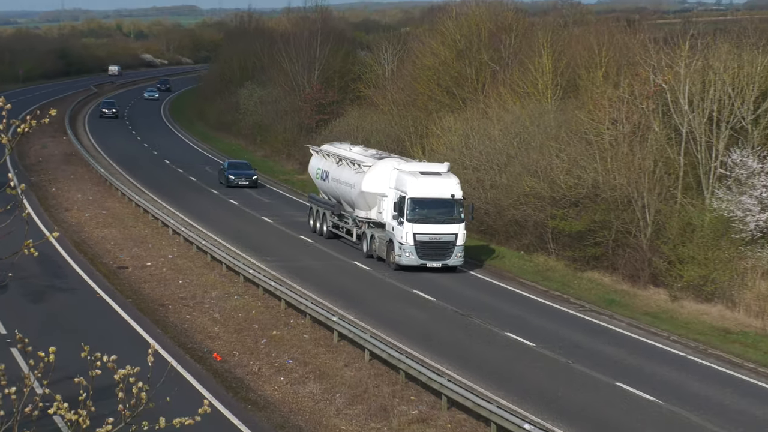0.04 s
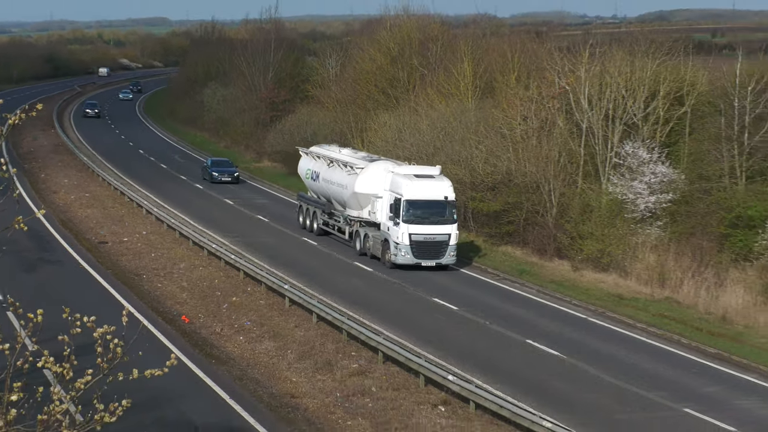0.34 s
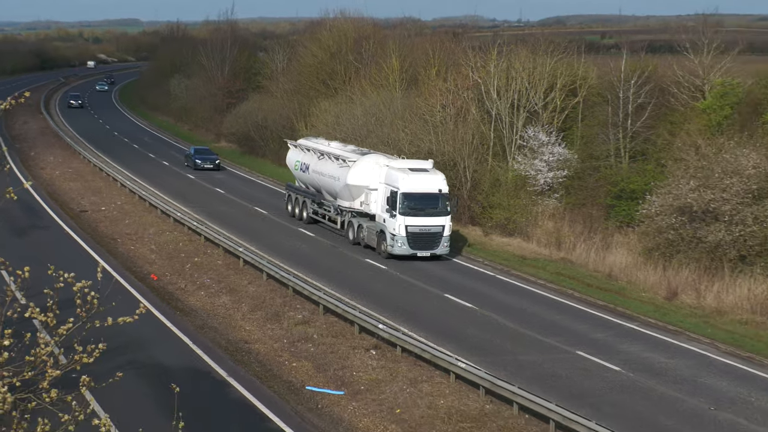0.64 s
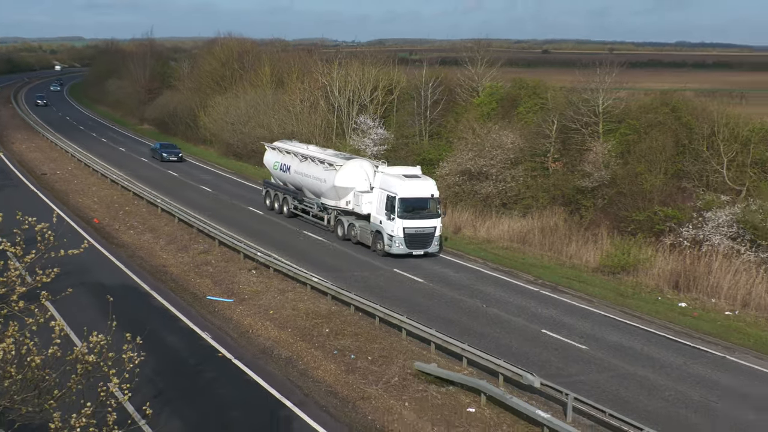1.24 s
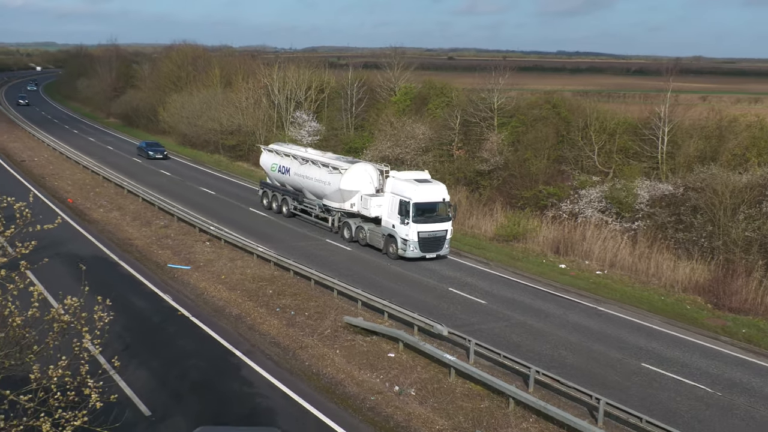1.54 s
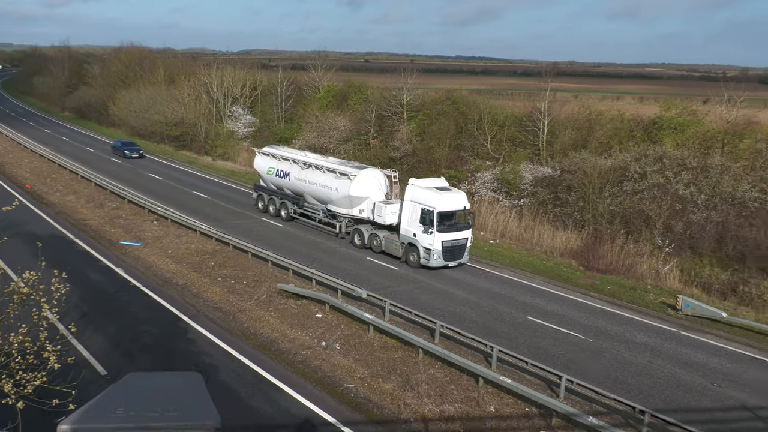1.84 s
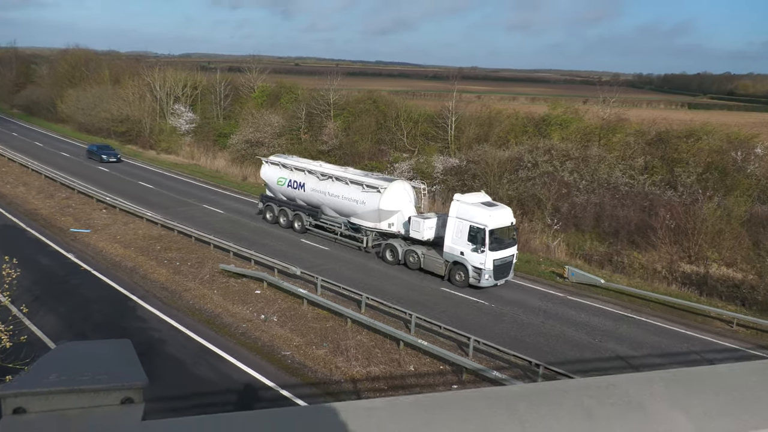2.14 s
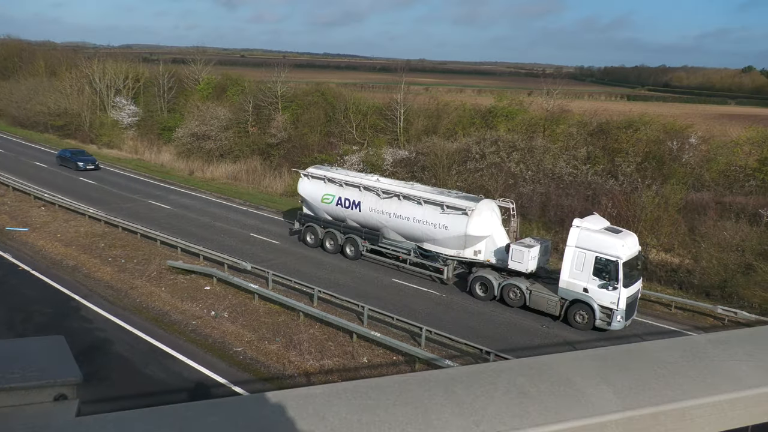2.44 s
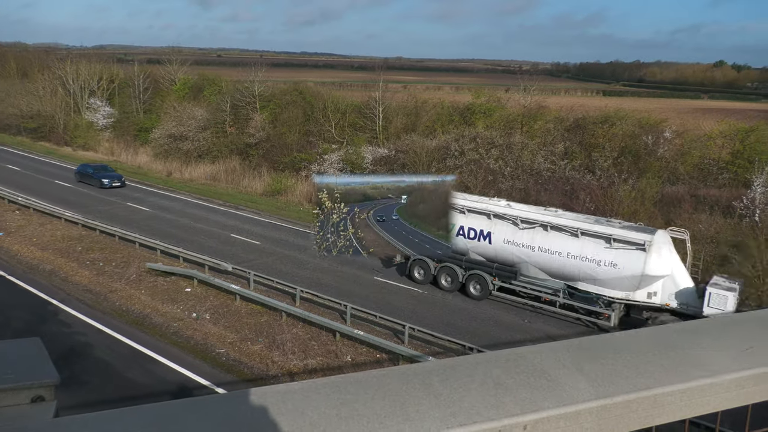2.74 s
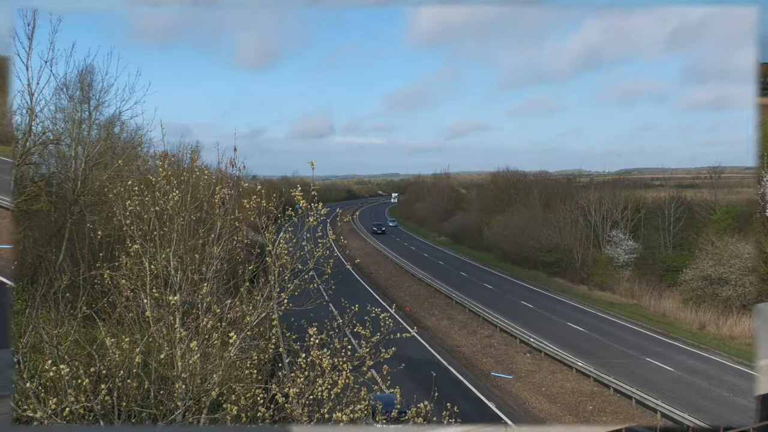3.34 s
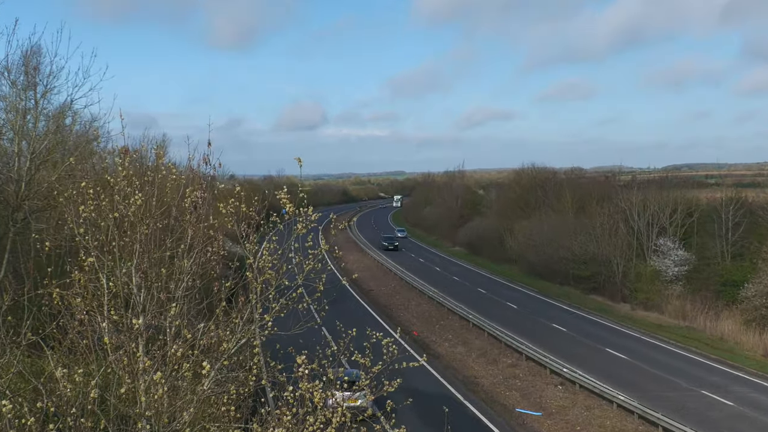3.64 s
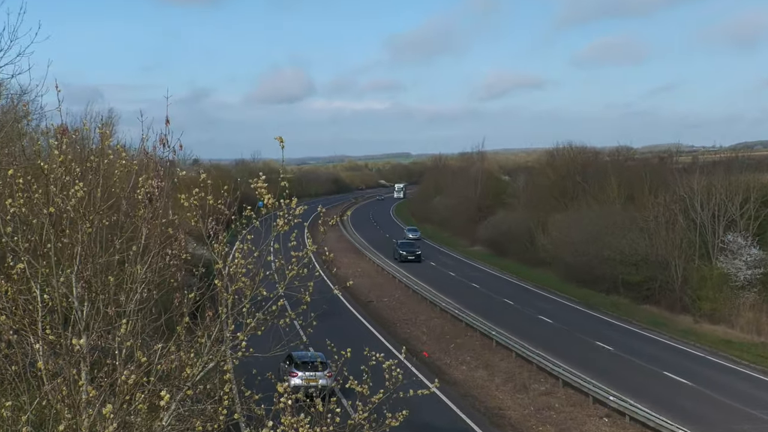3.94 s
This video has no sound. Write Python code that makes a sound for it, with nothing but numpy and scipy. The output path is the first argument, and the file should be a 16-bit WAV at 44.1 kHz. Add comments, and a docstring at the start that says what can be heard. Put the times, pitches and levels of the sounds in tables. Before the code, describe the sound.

A heavy lorry passes under a road bridge, heard from above against steady distant traffic and gusts on the microphone. From about 1 second its tyre roar, rumble and low exhaust drone build. Loose metal fittings faintly rattle and clink between 1.5 and 2.5 seconds. The drone drops in pitch and fades by 3 seconds, when the tyre noise of following cars swells and continues until 4 seconds.

```python
"""A tanker lorry passes under a road bridge, heard from the parapet.
From the start, far traffic and nearer cars sound as broadband noise while gusts buffet the microphone.
The lorry approaches: its tyres roar, its body rumbles and its exhaust drones at multiples of the
firing rate. As it goes by, small parts chatter and loose fittings clink, ringing at their metal modes.
The drone sinks in pitch and fades beneath the bridge, and the tyres of following cars swell."""
import sys
import numpy as np
from scipy import signal
from scipy.fft import rfft, irfft
from scipy.io import wavfile
from scipy.ndimage import uniform_filter1d

SR = 44100
rng = np.random.default_rng(int(sys.argv[2]) if len(sys.argv) > 2 else 0)


def store_wav(level_fs):
    """Save 16-bit WAV to argv[1]."""
    pcm = np.round(np.clip(np.atleast_2d(level_fs), -1, 1) * 32767)
    wavfile.write(sys.argv[1], SR, pcm.T.astype(np.int16))


N = 176400

# noise spectra of the sources (f/Hz, relative density/dB)
TRAFFIC_SPECTRUM = [(20, -20), (60, -7.5), (110, -6), (210, -1), (400, -5), (660, -0.5), (1000, -5),
                    (1400, -8), (2000, -18.5), (2600, -25.5), (3500, -30), (5000, -39), (6800, -47),
                    (8200, -50.5), (10000, -56.5), (12500, -78.5)]
LORRY_ROAR_SPECTRUM = [(250, -19), (450, -6), (600, -1.5), (730, 1.5), (830, -0.5), (920, 2), (1100, -3.5),
                       (1350, -20.5), (1700, -13.5), (2300, -29), (4000, -59)]
LORRY_RUMBLE_SPECTRUM = [(20, -26), (55, -10), (90, -1), (160, -0.5), (190, 3), (240, 1.5), (320, -0.5),
                         (420, -10.5), (800, -27), (2000, -68)]
LORRY_HISS_SPECTRUM = [(800, -4.5), (1750, -5), (2400, -0.5), (3400, -2.5), (4400, -8.5), (5800, -14),
                       (7000, -18.5), (8100, -19), (10000, -28), (12500, -47)]
CAR_ROAR_SPECTRUM = [(100, -28), (250, -3), (450, -9), (720, 4.5), (930, 1.5), (1150, 1.5), (1500, -13),
                     (2200, -26), (4000, -55)]
CAR_HISS_SPECTRUM = [(500, -5), (1300, -3), (1900, 0), (2600, -19), (3600, -17.5), (5500, -27),
                     (8200, -36.5), (10000, -40), (12500, -61.5)]
WIND_SPECTRUM = [(10, -18.5), (22, -5.5), (45, -4), (70, 1.5), (150, -3.5), (250, -11.5), (450, -21.5),
                 (800, -37), (2000, -76.5)]
CHATTER_SPECTRUM = [(1500, -10.5), (3200, 6), (4600, 0.5), (6200, -6), (8100, -10.5), (10200, -16.5),
                    (12000, -38.5)]
# likeness of the two channels (f/Hz, correlation)
ROAD_CORRELATION = [(450, 1), (900, 0.97), (1900, 0.85), (2800, 0.54), (5000, 0.24), (8200, .05),
                    (10500, -.8)]
LORRY_CORRELATION = [(100, 1), (3500, 1), (6000, 0.39), (8500, -0.12), (10500, -.4)]
# stereo balance of the lorry's hiss and chatter, and of the cars (f/Hz, left minus right/dB)
LORRY_BALANCE = [(1000, -5), (1650, 7), (2150, 6), (2800, 5.5), (4300, 2), (5500, 3.5), (6500, 4.5),
                 (7800, -7), (9300, 6)]
CAR_BALANCE = [(300, 0), (750, -3.5), (1700, 0), (3000, -3.5), (6000, 1)]
# the lorry's pass (t/s, tyre roar/dB, body rumble/dB, tyre hiss/dB)
LORRY_LEVELS = [(0, -31.5, -25.5, -54.5), (.85, -33.5, -39, -58), (1.1, -24, -28.5, -45.5),
                (1.4, -21, -27.5, -47), (1.7, -20.5, -27.5, -41), (1.82, -23.5, -28.5, -41),
                (2.05, -20, -24.5, -38.5), (2.32, -22, -26, -42), (2.5, -21.5, -27, -41),
                (2.73, -21, -22.5, -44), (2.92, -30.5, -36, -49.5), (3.3, -39, -50, -52),
                (4, -47.5, -40, -74.5)]
# note of the tyre treads (t/s, f/Hz, level relative to the roar/dB)
TREAD_NOTE = [(0, 645, -15), (1.0, 660, -13), (1.4, 680, -7.5), (1.7, 700, -4.5), (2.1, 748.4, -5),
              (2.35, 713, -5), (2.8, 640, -9), (4, 595, -11.5)]
# cars on the near lanes (t/s, tyre roar/dB, tyre hiss/dB)
CAR_LEVELS = [(0, -34, -61), (.7, -37.5, -40.5), (1.25, -36, -35.5), (2.0, -51, -56), (2.9, -26, -46),
              (3.1, -25, -33), (3.35, -25, -33.5), (3.65, -26.5, -37.5), (3.9, -21, -41), (4, -22, -52)]
# wind on the microphone (t/s, level/dB)
GUST_LEVELS = [(0, -39.5), (.15, -27), (.55, -26.5), (.95, -31), (1.15, -26.5), (1.3, -36), (1.7, -29),
               (1.85, -45), (2.13, -29), (2.47, -53.5), (3.2, -48), (3.5, -36.5), (3.75, -38), (4, -52)]
# exhaust drone (t/s, firing rate/Hz, level/dB)
EXHAUST_DRONE = [(0, 69, -48), (.7, 68.5, -39), (1.1, 67.8, -31), (1.7, 67.5, -30), (2.4, 66.1, -29.5),
                 (2.6, 62, -33), (2.8, 58, -47), (3.1, 56, -70)]
# engine orders (multiple of the firing rate, relative level/dB)
ENGINE_ORDERS = [(1, -0.5), (2, -13.5), (2.5, -17), (3, -20), (3.5, -15)]
# small loose parts along the chassis (t/s, level/dB)
CHATTER_LEVELS = [(0, -75), (1.4, -63), (1.65, -52), (1.85, -52), (2.15, -46.5), (2.3, -53), (2.7, -48.5),
                  (2.9, -58), (4, -83)]
# impacts of loose fittings (t/s, level/dB, band centre/Hz, left minus right/dB, crash T60/s)
FITTING_IMPACTS = [(1.576, -34, 4400, 3, .02), (1.620, -35.5, 3900, 3, .025), (1.657, -32.5, 3500, 3, .035),
                   (1.717, -36, 4600, 4, .035), (2.024, -34, 4500, 2, .065), (2.081, -37, 4500, 2, .03),
                   (2.126, -39, 5200, 2, .03), (2.156, -33, 5200, 2, .04), (2.242, -31, 5800, 0, .04),
                   (2.369, -39.5, 6900, -3, .06), (2.396, -37, 3200, 0, .02), (2.437, -38.5, 8700, -2, .02),
                   (2.453, -31.5, 7100, -7, .04)]
# natural modes of the fittings (f/Hz, relative level/dB, T60/s)
METAL_MODES = [(3400, 2, .08), (4300, -2, .06), (6020, -4, .05), (7320, -3, .06), (7980, -2, .09),
               (8230, -3, .09), (8800, -5, .08), (9650, -2, .05)]


def amp(db):
    """Amplitude ratio of a level in decibels."""
    return 10 ** (np.asarray(db) / 20)


def unit(x):
    """Normalisation to rms 1."""
    return x / np.sqrt(np.mean(x ** 2) + 1e-20)


def curve(rows, column=1):
    """Linear interpolation of a time table at every sample."""
    rows = np.array(rows)
    return np.interp(np.arange(N) / SR, rows[:, 0], rows[:, column])


def at_frequencies(points, hz):
    """Interpolation of a table on a log-frequency axis."""
    f, value = np.transpose(points)
    return np.interp(np.log(hz + 1), np.log(f + 1), value)


def band(hz, centre, octaves):
    """A Gaussian passband on an octave scale."""
    return np.exp(-.5 * (np.log2((hz + 1) / centre) / octaves) ** 2)


def drift(rate_hz):
    """Low-pass noise: slow random motion of rms 1."""
    hz = np.fft.rfftfreq(N, 1 / SR)
    return unit(irfft(rfft(rng.standard_normal(N)) * np.exp(-.5 * (hz / rate_hz) ** 2), N))


def noise(spectrum, correlation, patchy_db, balance=((1, 0), (2, 0))):
    """Partially coherent stereo noise of rms 1, its spectrum fluctuating in small random patches."""
    hz = np.fft.rfftfreq(2048, 1 / SR)
    a, b, c, d, patches = rng.standard_normal((N // 512 + 4, len(hz), 5)).T
    patches = unit(uniform_filter1d(uniform_filter1d(patches, 14, axis=0), 7, axis=1))
    shared = np.clip(at_frequencies(correlation, hz), -1, 1)[:, None]
    left = a + 1j * b
    right = shared * left + np.sqrt(1 - shared ** 2) * (c + 1j * d)
    lean = amp(at_frequencies(balance, hz) / 2)[:, None]
    colour = amp(at_frequencies(spectrum, hz)[:, None] + patchy_db * patches)
    frames = np.array([left * lean, right / lean]) * colour
    return unit(signal.istft(frames, nperseg=2048, noverlap=1536)[1][:, :N])


def far_traffic(level_db=-23):
    """Many distant vehicles add incoherently to a steady noise."""
    return amp(level_db) * noise(TRAFFIC_SPECTRUM, ROAD_CORRELATION, patchy_db=0.8)


def lorry(tread_width_hz=62):
    """Rolling noise: broadband tyre roar and hiss, a narrowband tread note and body rumble."""
    phase = 2 * np.pi * np.cumsum(curve(TREAD_NOTE)) / SR
    # random quadrature amplitudes spread the note into a narrow band
    tread = unit(drift(tread_width_hz / 2) * np.cos(phase) + drift(tread_width_hz / 2) * np.sin(phase))
    roar = noise(LORRY_ROAR_SPECTRUM, LORRY_CORRELATION, patchy_db=1.4)
    roar += amp(curve(TREAD_NOTE, column=2)) * tread
    rumble = noise(LORRY_RUMBLE_SPECTRUM, LORRY_CORRELATION, patchy_db=0.3)
    flutter = amp(1.4 * drift(rate_hz=35))
    hiss = flutter * noise(LORRY_HISS_SPECTRUM, LORRY_CORRELATION, patchy_db=1.2, balance=LORRY_BALANCE)
    roar_gain, rumble_gain, hiss_gain = (amp(curve(LORRY_LEVELS, column)) for column in (1, 2, 3))
    return roar * roar_gain + rumble * rumble_gain + hiss * hiss_gain


def cars():
    """Rolling noise of nearer cars: tyre roar and hiss, each with its own envelope."""
    roar = noise(CAR_ROAR_SPECTRUM, ROAD_CORRELATION, patchy_db=0.9, balance=CAR_BALANCE)
    hiss = noise(CAR_HISS_SPECTRUM, ROAD_CORRELATION, patchy_db=2, balance=CAR_BALANCE)
    return roar * amp(curve(CAR_LEVELS, column=1)) + hiss * amp(curve(CAR_LEVELS, column=2))


def wind(buffet_db=1.6, lean_db=3, correlation=-0.25):
    """Turbulent pressure of gusts, different at each microphone port and stronger on the right."""
    gusts = amp(curve(GUST_LEVELS) + buffet_db * drift(rate_hz=6.7))
    turbulence = noise(WIND_SPECTRUM, [(1, correlation), (2, correlation)], patchy_db=2.5)
    return turbulence * gusts * amp([[-lean_db], [lean_db]])


def exhaust(roughness=.42, wobble=.016):
    """Periodic firing radiates low engine orders, which sink in pitch as the lorry passes beneath."""
    firing_hz = curve(EXHAUST_DRONE) * (1 + wobble * drift(rate_hz=6.2))
    phase = 2 * np.pi * np.cumsum(firing_hz) / SR
    drone = np.zeros(N)
    for order, db in ENGINE_ORDERS:
        strength = amp(db) * (1 + roughness * drift(rate_hz=10))
        drone += strength * np.sin(order * phase + 2 * np.pi * rng.random())
    return unit(drone) * amp(curve(EXHAUST_DRONE, column=2))


def chatter(taps_per_s=110, power_decay_s=.004):
    """Shot noise: small parts tap at random, and the powers of their decaying bursts add."""
    taps = (rng.random(N) < taps_per_s / SR) * rng.uniform(0.22, 1, N) ** 2
    power = signal.lfilter([1], [1, -np.exp(-1 / (power_decay_s * SR))], taps)
    carrier = noise(CHATTER_SPECTRUM, LORRY_CORRELATION, patchy_db=1.2, balance=LORRY_BALANCE)
    return carrier * unit(np.sqrt(power)) * amp(curve(CHATTER_LEVELS))


def clinks(ring_db=-19, scatter_db=-19, scatter_t60=.12, knock_hz=3450, rise_s=.0016):
    """Impact excitation: a short crash, damped metal modes and scattering off the road and bridge."""
    out = np.zeros((2, N))
    t = np.arange(SR // 5) / SR
    hz = np.fft.rfftfreq(len(t), 1 / SR)
    rolloff = 1 / (1 + (hz / 10500) ** 16)
    envelope = np.minimum(t / rise_s, 1) * np.linspace(1, 0, len(t)) ** 2
    for start, db, centre_hz, pan_db, crash_t60 in FITTING_IMPACTS:
        burst = unit(rng.standard_normal((2, len(t))) + rng.standard_normal(len(t)))  # half correlated
        crash = burst * amp(-60 * t / crash_t60)
        scatter = burst * amp(scatter_db - 60 * t / scatter_t60)
        ring = sum(amp(level - 60 * t / t60) * np.sin(2 * np.pi * (f * t + rng.random()))
                   for f, level, t60 in METAL_MODES)
        colour = band(hz, centre_hz, octaves=.36) + amp(-2.5) * band(hz, knock_hz, octaves=.32)
        hit = irfft(rfft(crash + scatter + amp(ring_db) * ring) * unit(colour * rolloff), len(t))
        at = round(start * SR)
        out[:, at:at + len(t)] += hit * envelope * amp([[db + pan_db / 2], [db - pan_db / 2]])
    return out


def scene():
    """Superposition of all sources at the parapet."""
    return far_traffic() + lorry() + cars() + wind() + exhaust() + chatter() + clinks()


def record(dry, shelf_hz=11500, cutoff_hz=15700):
    """Frequency response: the microphone dulls the highest treble, then a low-pass limits the band."""
    hz = np.fft.rfftfreq(2 * N, 1 / SR)
    shelf = .4 + .6 / (1 + (hz / shelf_hz) ** 16)
    dulled = irfft(rfft(dry, 2 * N) * shelf)[:, :N]
    lowpass = signal.firwin(511, cutoff_hz, window=("kaiser", 9), fs=SR)
    return signal.oaconvolve(dulled, lowpass[None], "same")


dry = scene()
out = record(dry)
store_wav(out)
```